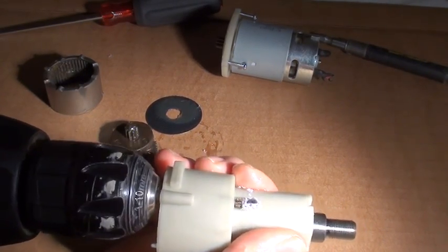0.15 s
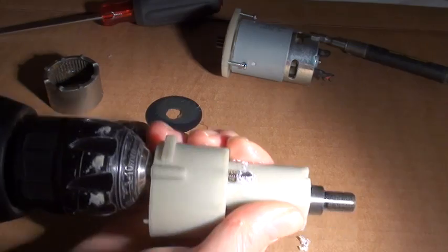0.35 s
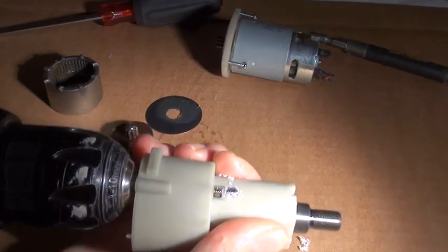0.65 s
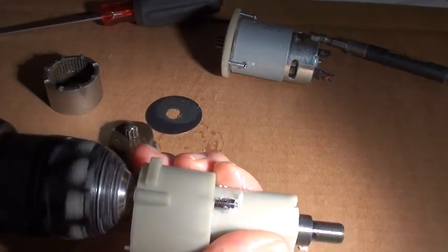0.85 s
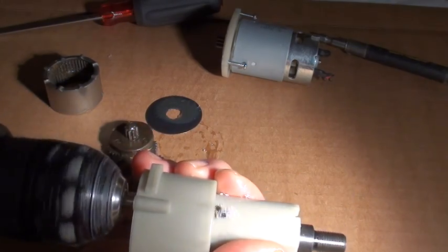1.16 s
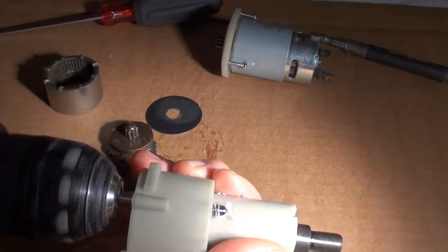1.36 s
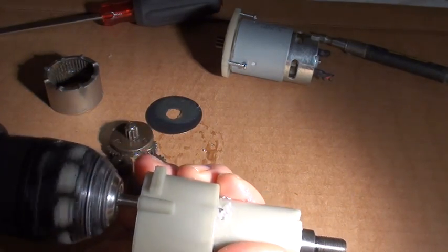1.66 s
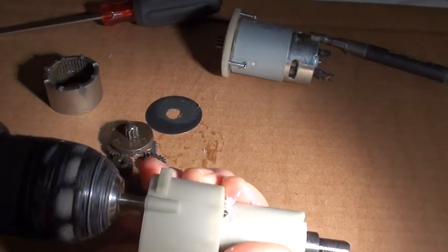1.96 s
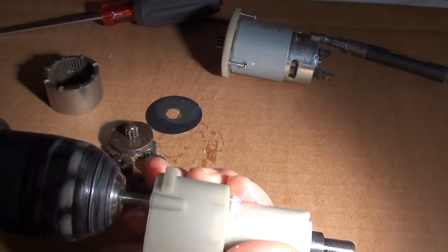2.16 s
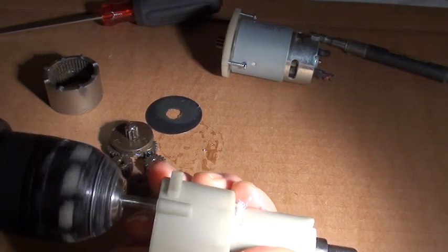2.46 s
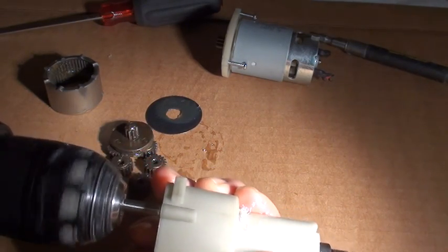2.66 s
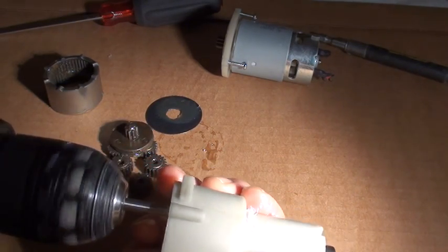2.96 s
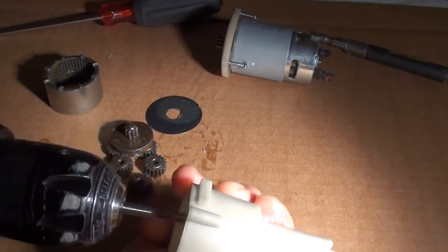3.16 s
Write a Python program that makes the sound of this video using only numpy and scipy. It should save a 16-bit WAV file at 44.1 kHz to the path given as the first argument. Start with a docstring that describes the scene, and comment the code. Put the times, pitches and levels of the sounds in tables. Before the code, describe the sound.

A cordless drill's switch and chuck click, its motor whirrs up, runs steadily, and stops sharply

```python
"""Cordless drill backing out a tap, close up

Switch and chuck click, the motor briefly coasts with a grainy rasp; then it runs up, backs a tap
out of a housing and brakes.
The armature sings whole multiples of its speed, the gears a few odd ones: gliding cosines.
The gearbox whirr is noise beaten by armature and planet turns; clicks are bursts into case resonances."""
import sys
import numpy as np
from scipy import signal
from scipy.fft import rfft, irfft
from scipy.io import wavfile
from scipy.ndimage import uniform_filter1d

SR = 44100
rng = np.random.default_rng(int(sys.argv[2]) if len(sys.argv) > 2 else 0)


def to_wav(s):
    """Save 16-bit WAV."""
    ch = np.atleast_2d(s).T  # columns
    pcm = np.round(np.clip(ch, -1, 1) * 32767)  # PCM
    wavfile.write(sys.argv[1], SR, pcm.astype(np.int16))


def volts(x):
    """Linear amplitude factor 10**(x/20) for a level x in dB, scalar or array-like."""
    e = np.asarray(x, float) / 20
    return 10 ** e


N = 145530

# Armature speed in three phases: t/s, f/Hz (turns per second)
RUN_UP = [(.72, 30), (.76, 124), (.78, 166), (.8, 204), (.825, 231), (.85, 248.3), (.87, 258.7), (.89, 266),
          (.91, 271), (.93, 274.8), (.96, 278.6)]
RUNNING = [(1.0, 282.4), (1.05, 285.2), (1.12, 286.5), (1.26, 287.1), (1.47, 286.4), (1.68, 285.4),
           (1.9, 284.1), (2.1, 285), (2.31, 286.4), (2.52, 288), (2.73, 289.2), (2.98, 290.1),
           (3.11, 290.4), (3.15, 283.4)]
BRAKING = [(3.16, 258), (3.168, 232), (3.178, 180), (3.19, 130), (3.21, 60), (3.24, 30)]
# Drill effort: t/s, whirr level/dB, load/1 (1 tap in the thread, 0 free),
# low tones level/dB, high tones level/dB, whirr bass level/dB, whirr treble level/dB
EFFORT = [(.7, -44, 1, -52, -63, 9, 9), (.72, -19, 1, -33, -44, 20.5, 14),
          (.742, -10, 0.75, -14, -21, 10, -3), (.762, 3, 0.81, -6.5, -24, 2, 0),
          (.8, 5.5, 0.51, -7, -15, 1, -0.5), (.85, 3, 0.71, -1.5, -4, 1, 0.5),
          (.92, 3.5, 0.69, 2, -6, -0.5, 0), (1.0, 4, 1, 1, -2.5, -2.5, -4),
          (1.3, 2.5, 0.84, 0.5, -1, 0, -1.5), (1.7, 4, 1, 0, -1.5, -1.5, -2),
          (2.1, 4, 1, 0, -2, -0.5, -2.5), (2.3, 1, 0.69, 0, -1, 0.5, -1.5), (2.5, -1, 0.34, 0, -1.5, 1, 1),
          (2.8, -3.5, 0.037, 0, -2, 3, 0), (3.11, -1.5, 0.23, 0, -1.5, 0.5, 0.5),
          (3.14, -3, 0.34, 2, -0.5, 1, 0), (3.16, 3, 0.3, -2, -2, 4.5, -3),
          (3.178, -2, 0, -2.5, -29, 4, -3), (3.195, -10, 0.38, -17, -42, 11.5, -2),
          (3.21, -15, 0.14, -30, -50, 3, 1), (3.235, -25, 0.15, -40, -50, 13.5, -3),
          (3.27, -39, 0, -60, -56, 0, -8)]
# Armature tones, one row per multiple 1, 2, 3 ..: loaded level/dB, free level/dB, before effort and body
ORDER_DB = [(-40.2, -41.1), (-46.0, -41.0), (-35.4, -34.8), (-41.5, -41.0), (-46.2, -46.2), (-44.5, -54.5),
            (-54.6, -52.2), (-52.0, -55.7), (-45.3, -47.3), (-54.6, -64.1), (-58.6, -55.6), (-37.9, -31.4),
            (-50.4, -50.0), (-50.3, -53.7), (-53.1, -52.5), (-49.5, -57.3), (-57.5, -51.5), (-54.6, -46.6),
            (-50.7, -46.2), (-52.3, -42.0), (-31.3, -28.0), (-31.0, -37.8), (-31.7, -24.9), (-21.7, -19.8),
            (-26.8, -29.3), (-29.7, -39.9), (-27.5, -31.9), (-40.7, -44.4), (-42.8, -45.7), (-43.7, -43.5),
            (-41.7, -52.3), (-45.5, -58.3), (-51.5, -47.5), (-49.7, -53.9), (-47.6, -45.3), (-48.0, -54.5),
            (-50.4, -42.8), (-54.5, -47.2), (-46.7, -55.0), (-57.1, -47.7), (-51.6, -55.3), (-50.1, -62.3),
            (-51.4, -54.9), (-54.9, -58.5), (-61.9, -59.2), (-54.3, -54.9), (-52.5, -61.7), (-56.4, -59.7),
            (-60.2, -68.0), (-53.6, -70.8), (-59.1, -63.2), (-68.0, -62.3), (-61.7, -66.2)]
# Gear tones: multiples of armature speed/1
GEAR_ORDERS = [2.62, 5.23, 13.83, 14.83, 15.83, 18.8, 21.23, 22.23, 23.23, 24.23]
# Their levels: loaded level/dB, free level/dB, before effort and body
GEAR_DB = [(-46, -62), (-43, -58), (-39, -51), (-35, -42), (-47, -51), (-46, -55), (-41, -50), (-33, -38),
           (-44, -41), (-41, -47)]
# Tones that swell on their own: multiple of armature speed/1 -> column of SOLO_SWELL
SOLO_COLUMN = {2: 1, 12: 2}
# Their swell: t/s, second multiple level/dB, commutator tone level/dB
SOLO_SWELL = [(.8, -1, -11), (.9, -0.5, 3), (1.1, 0, 5), (1.5, 1, 1), (1.75, 0.5, -3), (2.0, -6, 2),
              (2.15, -2.5, -12), (2.3, -4, -1.5), (2.5, -3, 1.5), (2.8, 0, 1.5), (3.11, 1, 2.5),
              (3.13, -7, -6), (3.16, 1.5, -3)]
# Level change while running up, before top speed is first reached:
# multiple of armature speed/1 -> level/dB
RUN_UP_STRAIN_DB = {14.83: 5, 21: 3, 24: -3, 26: 5, 27: 2, 28: 8, 29: 8, 30: 11, 33: 21, 36: 11}
# Low body resonances and a dip: f/Hz, width/Hz, level/dB
HANDLE = [(480, 70, 6), (725, 55, 12), (812, 16, -16), (1075, 50, 7)]
# Gearbox whirr spectrum before effort: f/Hz, loaded density/(dB per Hz), free density/(dB per Hz)
WHIRR = [(60, -103, -100), (120, -121, -111), (199, -87, -98), (273, -80.5, -78), (434, -75, -83),
         (580, -74, -77.5), (930, -71.5, -68.5), (1160, -65.5, -66.5), (1700, -66, -67.5),
         (2170, -64, -64.5), (2400, -67, -68), (2980, -72.5, -74), (3710, -69, -61.5), (3940, -63, -59),
         (4770, -71, -66.5), (5460, -64, -59.5), (6670, -60, -52.5), (6380, -57.5, -50), (7660, -61.5, -58),
         (7700, -66.5, -60.5), (9170, -63, -66.5), (10050, -70, -66), (12060, -78.5, -77.5),
         (14140, -80.5, -83), (15660, -96, -89)]
# Clicks of switch, chuck and gear play: t/s, level/dB, low modes level/dB, high modes level/dB,
# t60/s, thump level/dB, top modes level/dB
CLICKS = [(0.057, -13, -16.5, -17.5, 0.007, -29, -20), (0.154, -20, -8.5, -29, 0.018, -24, -43),
          (0.159, -27, -3, -23, 0.014, -23, -27), (0.183, -24, -21, -6.5, 0.022, -32, -11),
          (0.214, -23, -19, -7, 0.014, -39, -14), (0.245, -9, -13, -20, 0.0083, -16.5, -11.5),
          (0.247, -12.5, -3, -15, 0.0099, -14.5, -31), (0.276, -21, -9, -9, 0.006, -34, -9),
          (0.28, -25, -10, -9, 0.005, -34, -12), (0.284, -6, -18, -9.5, 0.019, -51, -11),
          (0.295, -14, -25, -7, 0.012, -46, -13), (0.303, -17.5, -30, -9, 0.026, -32, -7),
          (0.328, -26, -7, -24, 0.015, -25, -25), (0.454, -30.5, -10, -26, 0.014, -13, -28),
          (0.518, -16, -22, -21, 0.018, -55.5, -12), (0.523, -11, -20, -12, 0.052, -55, -16.5),
          (0.527, -17.5, -11.5, -10, 0.011, -42, -10), (0.539, -26, -13, -7, 0.023, -34, -16),
          (0.5899, -3, -19.5, -13, 0.019, -58, -19), (0.646, -39, -1, -14, 0.022, -19, -22),
          (0.669, -38, -25, -35, 0.041, -7, -40), (0.68, -6.5, -12.5, -23, 0.0079, -20.5, -25.5),
          (0.6878, -18, -9, -9, 0.025, -18, -22), (0.7005, -17, -13, -14, 0.035, -29, -17),
          (0.706, -4, -13, -13, 0.022, -34, -16.5), (0.718, -11, -19, -6, 0.029, -40, -18),
          (0.724, -16, -8, -7, 0.021, -35, -19), (3.199, -25, -10, -12, 0.008, -17, -30),
          (3.2106, -9.5, -14.5, -11, 0.0091, -27, -35), (3.25, -37, -3, -10, 0.0077, -6, -21),
          (3.264, -13.5, -12.5, -8, 0.01, -36, -31)]
# Case resonances in four groups: f/Hz, width/Hz, level/dB
CASE_LOW = [(1300, 600, -9), (1880, 40, -7), (2030, 700, -1), (2520, 35, -6), (2750, 450, -3),
            (3500, 700, -10), (4300, 900, -11)]
CASE_HIGH = [(4930, 70, -9), (5400, 450, -4), (5660, 50, -7), (6200, 550, 0), (7050, 550, 0),
             (7750, 700, -3)]
CASE_THUMP = [(302, 210, -1), (470, 100, 2.5), (1010, 470, -2)]
CASE_TOP = [(8280, 1400, 18), (10370, 580, -3), (10200, 1700, 2)]
# Treble loss of clicks and ping: f/Hz, level/dB
CASE_ROLL_OFF = [(10500, -1), (12000, -6), (16000, -26)]
# Metal part ringing as the gears take up: t/s, f/Hz, level/dB, t60/s, sag/Hz
PING = (.718, 4250, -19, .09, 120)
# Grainy rasp as the motor briefly coasts: t/s, level/dB
RASP = [(.16, -69), (.2, -46), (.235, -40), (.27, -50), (.29, -31), (.315, -27.5), (.34, -35), (.38, -43),
        (.43, -55), (.5, -64)]
# Rasp spectrum before levelling: f/Hz, level/dB
RASP_COLOUR = [(200, -33), (900, -11), (1500, -9), (2300, -7.5), (3200, -4.5), (4200, -7.5), (5500, -4.5),
               (7000, 1), (8500, -6), (11000, -20), (15000, -34)]
# Faint narrow rub: t/s, level/dB
RUB = [(0, -51), (.1, -57), (.2, -49), (.3, -52), (.34, -49), (.42, -48.5), (.47, -48.5), (.5, -79),
       (.7, -73)]
# Room noise spectrum before levelling: f/Hz, level/dB
ROOM_COLOUR = [(25, -31), (100, -12.5), (300, -7.5), (500, -3), (900, -8), (1500, -5.5), (3000, -14.5),
               (4500, -7), (8000, -13.5), (12000, -23), (15000, -19)]
# Room noise level over ROOM_DB: t/s, level/dB
ROOM_SWELL = [(0, 4.5), (.3, 10.5), (.5, 2), (.65, 3.5), (3.2, 9), (3.3, 1.5)]
# Stereo balance: f/Hz, left minus right level/dB
LEFT_DB = [(380, 0.0), (700, 1.5), (1290, 3.0), (2380, 3.8), (4400, 4), (7000, 4.5), (9000, 3), (12000, .5),
           (15000, -.5)]
# Reflections unlike at both ears: f/Hz, level/dB
WIDE = [(100, -91), (500, -19), (2000, -14.5), (5000, -20.5), (10000, -12), (15000, -11)]

ROOM_DB, AIR_SIDE_GAIN = -53.5, .12
BENCH_T60_S = .17
RUB_HZ, RUB_WIDTH_HZ = 1660, 170
RASP_GRAIN_DB, RASP_GRAIN_S = 2.8, .002
SNAP_GAIN, SNAP_T60_S = 3.5, .002  # first impact against the rattle that follows
CLICK_TAIL_DB, CLICK_TAIL_T60_S, CLICK_RISE_S, CLICK_CREST_DB = -24, .12, .0002, 18
JITTER_TURNS, JITTER_S = .001, .03
GEAR_PLAY_TURNS, GEAR_PLAY_S = .008, .012  # backlash blurs the gear tones
WAVER_DB, WAVER_S, DRIFT_DB, DRIFT_S = 1.6, .04, 1.2, .25
LOW_HZ, LOW_DB_PER_OCT = 302, 15
LOW_ORDERS, HIGH_DB_PER_ORDER = 4, .06
RUN_UP_STRAIN_HZ = 12  # scale of the gap between top speed and the highest speed reached so far
PLANET_ORDER, TURN_BEAT, PLANET_BEAT = 1.31, .15, .13
RATTLE_DB, RATTLE_S, SURGE_DB, SURGE_S = 1, .0026, .84, .02
PATCH_DB, PATCH_HOPS, PATCH_BINS = -.5, 10, 4
BASS_HZ, TREBLE_HZ = 3000, 8200
SOFT_LIMIT, EDGE_HZ = 1.1, 15600


def evened(x):
    """Scale to rms 1."""
    return x / np.sqrt(np.mean(x ** 2) + 1e-20)


def read(points, hz, column=1):
    """Interpolate a spectrum column over log frequency."""
    columns = np.transpose(points)
    return np.interp(np.log(hz + 1), np.log(columns[0] + 1), columns[column])


def curve(points, column=1):
    """Interpolate a time column at every sample."""
    columns = np.transpose(points)
    return np.interp(np.arange(N) / SR, columns[0], columns[column])


def colour(x, points, column=1):
    """Zero-phase filter with the tabled dB response."""
    hz = np.fft.rfftfreq(x.shape[-1], 1 / SR)
    return irfft(rfft(x) * volts(read(points, hz, column)), x.shape[-1])


def slow(time_s):
    """Random drift of rms 1: noise smoothed twice over time_s."""
    size = max(int(time_s * SR), 1)
    smooth = uniform_filter1d(rng.standard_normal(N), size)
    return evened(uniform_filter1d(smooth, size))


def ring(x, modes):
    """Parallel two-pole resonances of alternating sign."""
    out = 0
    for k, (hz, width_hz, db) in enumerate(modes):
        radius = np.exp(-np.pi * width_hz / SR)
        poles = [1, -2 * radius * np.cos(2 * np.pi * hz / SR), radius ** 2]
        gain = (-1) ** k * volts(db) * (1 - radius)
        out = out + gain * signal.lfilter([1, 0, -1], poles, x)
    return out


def room_air():
    """Coloured room noise, nearly alike in both channels."""
    middle, side = rng.standard_normal((2, N))
    air = middle + AIR_SIDE_GAIN * side * np.array([[1], [-1]])
    return volts(ROOM_DB + curve(ROOM_SWELL)) * evened(colour(air, ROOM_COLOUR))


def rub_and_rasp():
    """A faint rub of resonant noise, and a rasp of grainy noise as the motor briefly coasts."""
    t = np.arange(N) / SR
    grain = rng.standard_normal(N) * volts(RASP_GRAIN_DB * slow(RASP_GRAIN_S))
    rasp = evened(colour(grain, RASP_COLOUR)) * volts(curve(RASP))
    rasp *= (t > RASP[0][0]) * (t < RASP[-1][0])
    rub = evened(ring(rng.standard_normal(N), [(RUB_HZ, RUB_WIDTH_HZ, 0)]))
    return rasp + rub * volts(curve(RUB)) * (t < RUB[-1][0])


def clicks():
    """Impacts: short random-sign bursts with a faint tail excite the plastic case."""
    out, t = np.zeros(N + 6000), np.arange(6000) / SR
    for start_s, db, low_db, high_db, t60_s, thump_db, top_db in CLICKS:
        snap = SNAP_GAIN * volts(-60 * t / SNAP_T60_S)
        tail = volts(CLICK_TAIL_DB - 60 * t / CLICK_TAIL_T60_S)
        fall = snap + volts(-60 * t / t60_s) + tail
        burst = rng.choice([-1., 1.], len(t)) * fall * np.minimum(t / CLICK_RISE_S, 1)
        groups = ((low_db, CASE_LOW), (high_db, CASE_HIGH), (thump_db, CASE_THUMP), (top_db, CASE_TOP))
        for part_db, modes in groups:
            part = ring(burst, modes)
            part *= volts(db + part_db + CLICK_CREST_DB) / np.linalg.norm(part)  # set by energy
            out[round(start_s * SR):][:len(t)] += part
    return colour(out[:N], CASE_ROLL_OFF)


def body_db(hz):
    """Resonances of the drill body, felt by a tone as it glides."""
    peaks = sum(db / (1 + ((hz - centre_hz) / width_hz) ** 2) for centre_hz, width_hz, db in HANDLE)
    low_loss = LOW_DB_PER_OCT * np.minimum(np.log2(hz / LOW_HZ), 0)
    return peaks + low_loss + read(WHIRR, np.maximum(hz, 1500))


def motor_tones(speed, turns, load):
    """Cosines locked to the armature turns, their levels set by load, run-up and body."""
    geared = turns + GEAR_PLAY_TURNS * slow(GEAR_PLAY_S)
    waver = WAVER_DB * slow(WAVER_S) + DRIFT_DB * slow(DRIFT_S)
    low_db, high_db = curve(EFFORT, 3), curve(EFFORT, 4)
    run_up_strain = np.tanh((speed.max() - np.maximum.accumulate(speed)) / RUN_UP_STRAIN_HZ)
    tones, coarse = np.zeros(N), np.arange(0, N, 32)  # levels every 32 samples
    orders = list(range(1, len(ORDER_DB) + 1)) + list(GEAR_ORDERS)
    for k, (loaded_db, free_db) in zip(orders, list(ORDER_DB) + list(GEAR_DB)):
        start, shift = rng.random(2)
        db = free_db + (loaded_db - free_db) * load
        if k <= LOW_ORDERS:
            db += low_db
        else:
            db += high_db + run_up_strain * RUN_UP_STRAIN_DB.get(k, 0)
            if k not in SOLO_COLUMN:
                db += np.roll(waver, int(shift * N))
        if k in SOLO_COLUMN:
            db += curve(SOLO_SWELL, SOLO_COLUMN[k])
        db = db[coarse] + HIGH_DB_PER_ORDER * k
        db += body_db(k * speed[coarse]) - body_db(k * np.median(speed))
        level = np.interp(np.arange(N), coarse, volts(db)) * np.sqrt(2)  # dB is rms
        cycles = k * (geared if k in GEAR_ORDERS else turns) + start
        tones += level * np.cos(2 * np.pi * cycles)
    return tones


def patchy(x):
    """Random patches of level over time and frequency: loose parts light up separate bands."""
    z = signal.stft(x, nperseg=256, noverlap=192)[2]
    field = rng.standard_normal(z.shape[::-1]).T
    field = uniform_filter1d(field, PATCH_BINS, 0)
    field = evened(uniform_filter1d(field, PATCH_HOPS, 1))
    return signal.istft(z * volts(PATCH_DB * field), nperseg=256, noverlap=192)[1][:N]


def gearbox_whirr(turns, load):
    """Rattling noise beaten by each turn of armature and planet gears; load blends two spectra."""
    armature_beat = 1 + TURN_BEAT * np.cos(2 * np.pi * turns)
    planet_beat = 1 + PLANET_BEAT * np.cos(2 * np.pi * PLANET_ORDER * turns)
    rattle = volts(RATTLE_DB * slow(RATTLE_S) + SURGE_DB * slow(SURGE_S))
    teeth = evened(rng.standard_normal(N) * armature_beat * planet_beat * rattle)
    teeth *= volts(curve(EFFORT)) * np.sqrt(SR / 2)  # unit density per Hz
    whirr = patchy(load * colour(teeth, WHIRR) + (1 - load) * colour(teeth, WHIRR, 2))
    bass = colour(whirr, [(BASS_HZ, 0), (BASS_HZ + 500, -80)])
    treble = colour(whirr, [(TREBLE_HZ - 500, -80), (TREBLE_HZ, 0)])
    middle = whirr - bass - treble
    return middle + bass * volts(curve(EFFORT, 5)) + treble * volts(curve(EFFORT, 6))


def drill():
    """Armature rotation drives both the tones and the beats of the whirr."""
    speed = uniform_filter1d(curve(list(RUN_UP) + list(RUNNING) + list(BRAKING)), 300)
    turns = np.cumsum(speed) / SR + JITTER_TURNS * slow(JITTER_S)
    load = np.clip(curve(EFFORT, 2), 0, 1)
    return motor_tones(speed, turns, load) + gearbox_whirr(turns, load)


def metal_ping():
    """A decaying sine whose pitch sags and trembles."""
    out, t = np.zeros(N), np.arange(6000) / SR
    start_s, hz, db, t60_s, sag_hz = PING
    tremble_hz = 900 * uniform_filter1d(rng.standard_normal(len(t)), 60)
    turns = np.cumsum(hz - sag_hz * np.minimum(t / t60_s, 1) + tremble_hz) / SR
    envelope = volts(db - 60 * t / t60_s) * np.minimum(t / .0024, 1)
    out[round(start_s * SR):][:len(t)] += envelope * np.sin(2 * np.pi * turns)
    return colour(out, CASE_ROLL_OFF)


def reflections(near):
    """Convolution with decaying noise, used in opposite sign at the two ears."""
    t = np.arange(4000) / SR
    echo = rng.standard_normal(len(t)) * volts(-60 * t / BENCH_T60_S)
    return colour(signal.oaconvolve(near, echo / np.linalg.norm(echo))[:N], WIDE)


def scene():
    """Near sources with reflections, balanced left and right, over room noise."""
    near = rub_and_rasp() + clicks() + drill() + metal_ping()
    wide = reflections(near)
    left = colour(near + wide, [(hz, db / 2) for hz, db in LEFT_DB])
    right = colour(near - wide, [(hz, -db / 2) for hz, db in LEFT_DB])
    return np.array([left, right]) + room_air()


def top_cut(x):
    """Nothing passes above the cut-off."""
    return signal.sosfilt(signal.butter(12, 16480, fs=SR, output="sos"), x)


def record(dry):
    """Soft overload, then band limit."""
    limited = SOFT_LIMIT * np.tanh(dry / SOFT_LIMIT)
    edge = signal.firwin(255, EDGE_HZ, window=("kaiser", 8), fs=SR)
    mix = signal.oaconvolve(limited, edge[None], "same")
    return top_cut(mix)


dry = scene()
out = record(dry)
to_wav(out)
```